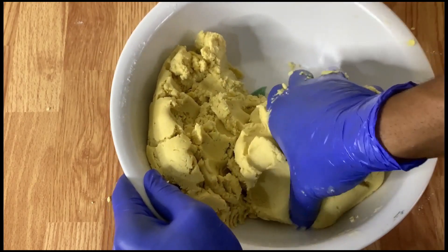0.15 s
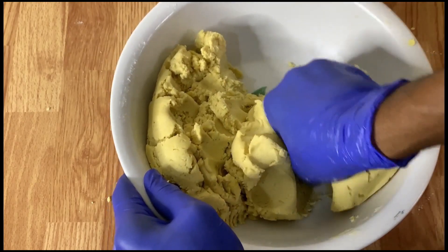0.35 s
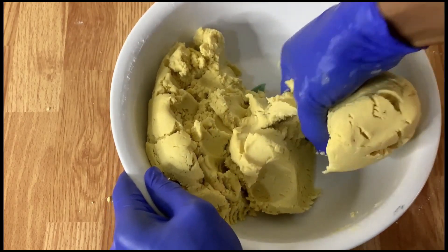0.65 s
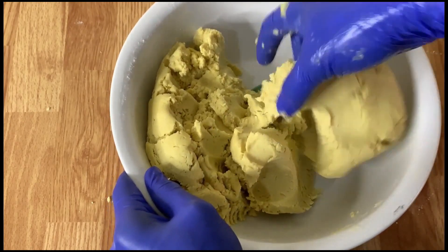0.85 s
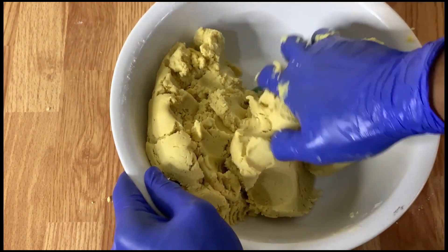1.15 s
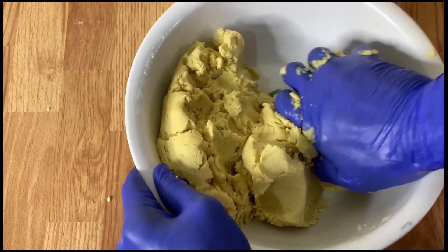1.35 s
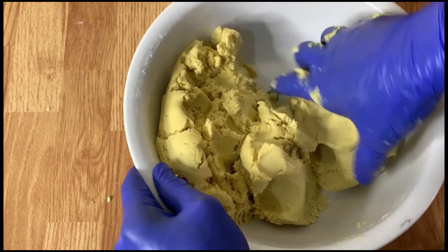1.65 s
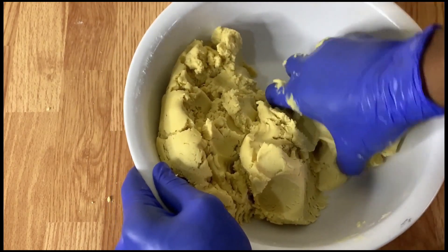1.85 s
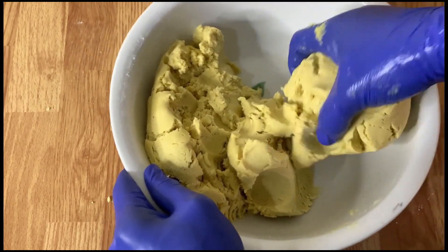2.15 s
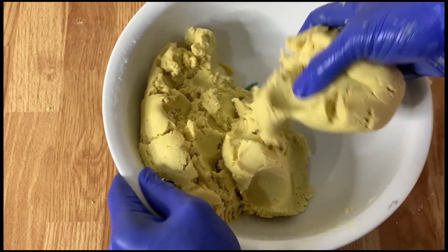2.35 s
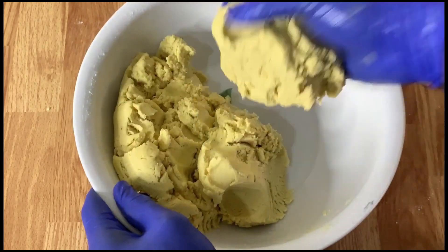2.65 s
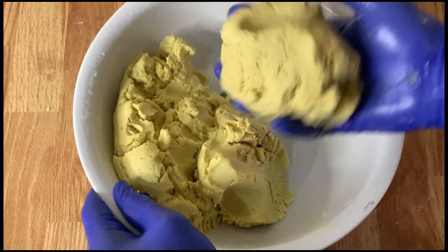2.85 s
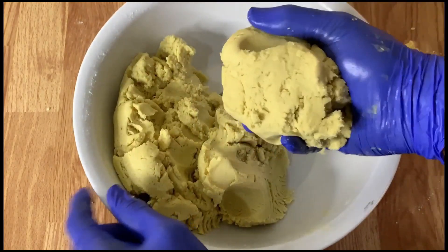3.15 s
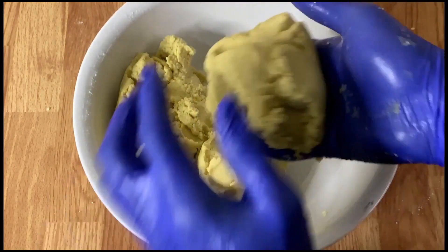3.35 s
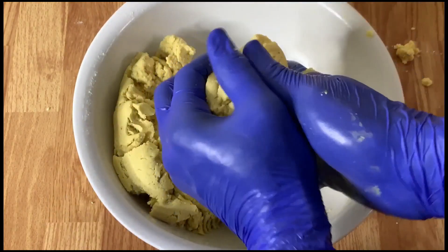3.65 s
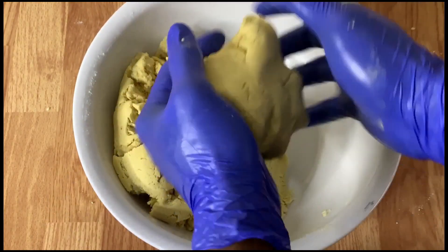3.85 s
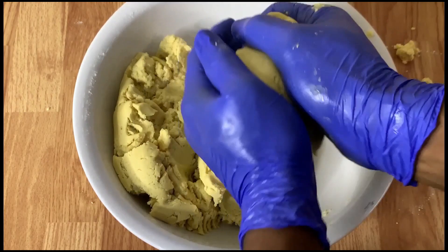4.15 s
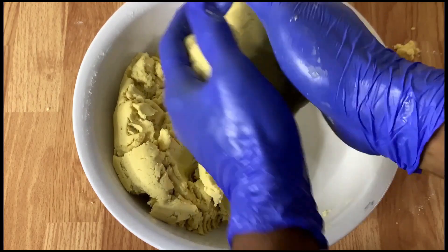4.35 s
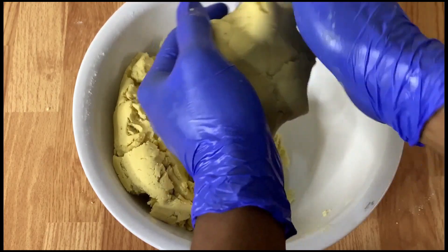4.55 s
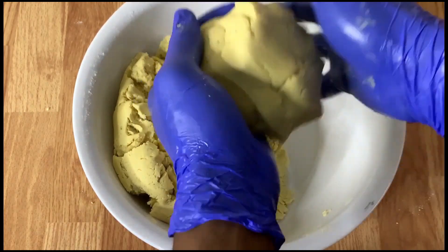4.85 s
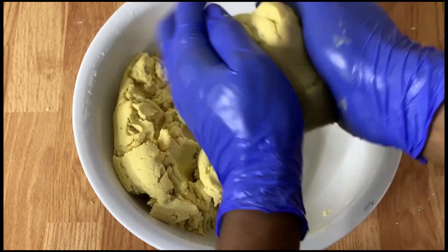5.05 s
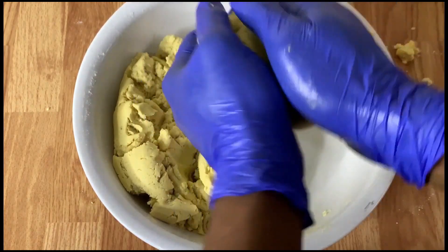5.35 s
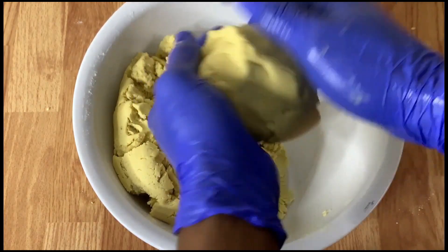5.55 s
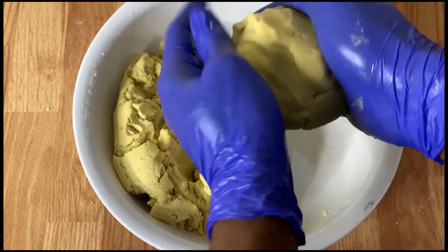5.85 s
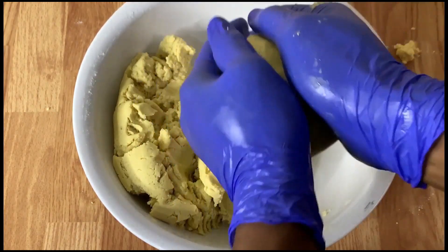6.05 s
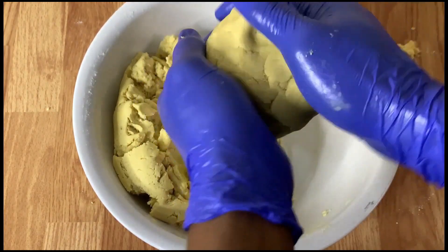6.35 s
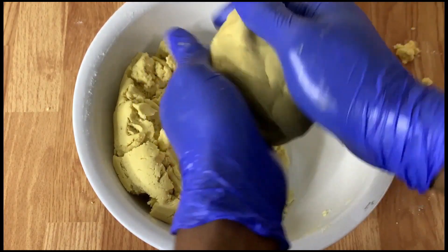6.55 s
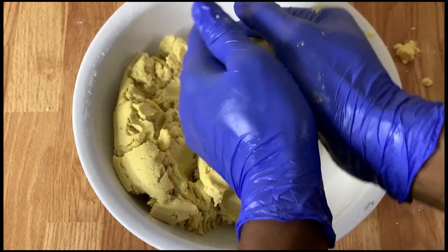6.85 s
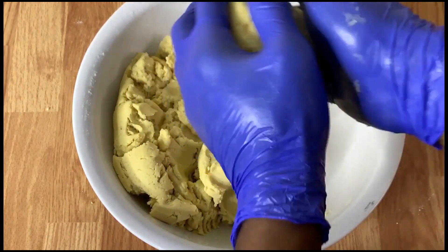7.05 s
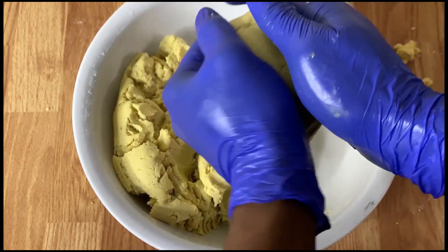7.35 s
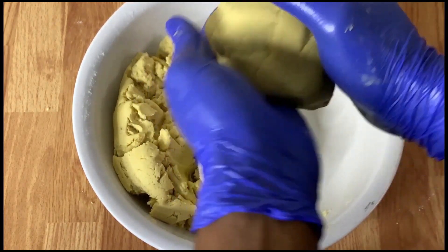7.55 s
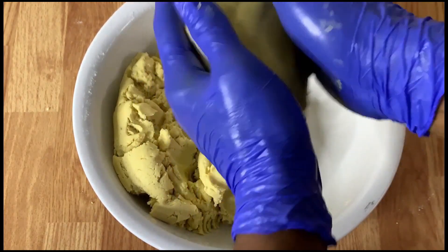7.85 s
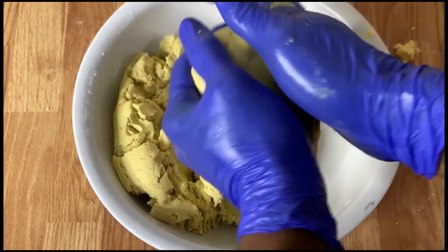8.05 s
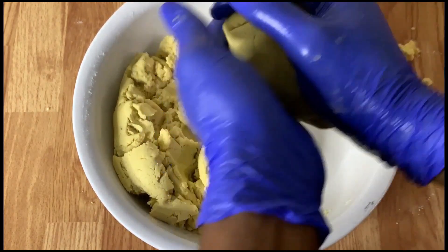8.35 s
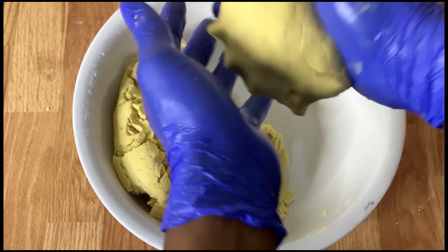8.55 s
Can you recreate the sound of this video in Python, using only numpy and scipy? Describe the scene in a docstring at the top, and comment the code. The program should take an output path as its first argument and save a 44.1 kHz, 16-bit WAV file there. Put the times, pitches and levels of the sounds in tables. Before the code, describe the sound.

Close kitchen sounds of rubber gloves squishing dense dough, short crackly rubs and snaps, a bowl knocking on wood and soft low thumps.

```python
"""A kitchen: gloved hands knead crumbly dough in a plastic bowl on a wooden counter, then pat a ball of it into
shape. The bowl knocks and slides, as pulses of squeezed air and noise ringing through its resonances. The
gloves squish, peel and snap, as clumped grains of noise and millisecond blips; the counter thumps softly, as
low sines that sag. The room answers with decaying noise tails. Much of the treble is nearly the same in both
channels, the left a little ahead; the level dips briefly twice."""
import sys
import numpy as np
from scipy import signal
from scipy.fft import rfft, irfft, next_fast_len
from scipy.io import wavfile
from scipy.ndimage import uniform_filter1d, map_coordinates

SR = 44100
rng = np.random.default_rng(int(sys.argv[2]) if len(sys.argv) > 2 else 0)


def unload_audio(sound):
    """Save the sound as a 16-bit wav file, at the path given as the first command line argument."""
    columns = np.transpose(np.atleast_2d(sound))
    # keep every value between -1 and 1, then stretch to whole-number steps
    steps = np.round(np.clip(columns, -1, 1) * 32767)
    wavfile.write(sys.argv[1], SR, steps.astype(np.int16))


def ratio_of_db(decibels):
    """Turn decibels (scalar or array-like) into linear amplitude factors; 0 dB maps to 1."""
    return 10 ** (np.asarray(decibels, float) / 20)


N = 384111  # samples


def unit(x):
    """Scale to rms 1."""
    return x / np.sqrt(np.mean(x ** 2) + 1e-20)


def along(points, hz):
    """Read a table of (frequency, value) points on a log frequency axis."""
    point_hz, value = np.transpose(points)
    return np.interp(np.log(hz + 1), np.log(point_hz + 1), value)


def curves(rows):
    """One value per sample for each column after the time."""
    s, *columns = np.transpose(rows)
    return [np.interp(np.arange(N) / SR, s, column) for column in columns]


def wobble(rate):
    """A smooth random curve, rate knots a second."""
    knots = rng.standard_normal(int(N * rate / SR) + 4)
    return map_coordinates(knots, [np.arange(N) * rate / SR])


def ramps(rows, rise_db_per_s, fall_db_per_s):
    """Gain of (start_s, length_s, level_db) events that climb, hold and die away at steady rates."""
    t = np.arange(N) / SR
    gain = 0
    for start, length, db in rows:
        climb_db = rise_db_per_s * np.maximum(start - t, 0)
        decay_db = fall_db_per_s * np.maximum(t - start - length, 0)
        gain = gain + ratio_of_db(db - climb_db - decay_db)
    return gain


def filtered(x, response):
    """x times a complex response of frequency."""
    n = x.shape[-1]
    m = next_fast_len(n + 4096)
    return irfft(rfft(x, m) * response(np.fft.rfftfreq(m, 1 / SR)), m)[..., :n]


def coloured(x, spectrum):
    """x shaped by a spectrum table, rms 1."""
    return unit(filtered(x, lambda hz: ratio_of_db(along(spectrum, hz))))


def peak(f, hz, width_hz):
    """One causal resonance."""
    return 1j * f * width_hz / (hz * hz - f * f + 1j * f * width_hz + 1e-9)


def above(x, corner_hz):
    """The part of x above a steep corner."""
    return filtered(x, lambda hz: 1 / (1 + (corner_hz / (hz + 1)) ** 8))


def add(track, s, sound):
    """Mix a short sound in at time s."""
    i = round(s * SR)
    track[..., i:i + sound.shape[-1]] += sound


# how alike the two ports hear each frequency: pitch_hz, likeness (0 to 1)
PORT_LIKENESS = [(60, 1), (200, 0.81), (600, 0.24), (1500, 0.2), (3000, 0.53), (4400, .99), (9000, 0.89),
                 (15000, 0.44)]


def spread(a, b):
    """Mix two versions of a sound into two ports with the likeness of each frequency."""
    def mid_side_gain(hz):
        angle = np.arccos(np.clip(along(PORT_LIKENESS, hz), -1, 1)) / 2
        return np.array([np.cos(angle), np.sin(angle)])
    mid, side = filtered(np.array([a, b]), mid_side_gain)
    return np.array([mid + side, mid - side])


# work of arms and hands between strokes: time_s, counter_stir_db, glove_rustle_db
HAND_WORK = [(0.0, -69.5, -79.5), (0.34, -68, -83), (0.65, -57, -59), (1.05, -64, -76.5),
             (1.89, -63, -71.5), (2.18, -59, -58.5), (2.5, -62, -75.5), (2.75, -53.5, -63),
             (3.05, -65.5, -69.5), (3.45, -62.5, -54.5), (3.7, -55.5, -75), (4.3, -49.5, -60),
             (5.3, -58.5, -71), (5.6, -56.5, -71), (6.94, -58.5, -57.5), (7.33, -59.5, -66),
             (7.55, -52.5, -55), (8.35, -62.5, -64.5), (8.71, -59, -62)]
# soft pushes sounding in the wood: time_s, level_db
WOOD_PUSHES = [(.46, -48.5), (0.902, -49), (1.31, -47.5), (1.75, -45), (2.011, -41), (2.86, -52.5),
               (3.3, -60), (3.45, -51), (3.52, -45), (4.051, -48.5), (5.46, -50), (6.14, -47),
               (6.57, -49.5), (7.01, -48.5), (7.42, -48), (8.609, -50)]
# spectral shapes of bass rumble, wood and room air: pitch_hz, level_db (per Hz)
RUMBLE_SPECTRUM = [(20, -15.5), (45, -10.5), (80, 1), (130, -3), (190, -14), (300, -37)]
WOOD_SPECTRUM = [(150, -24), (220, -1.5), (300, 3), (400, -4), (500, -21.5), (800, -51.5)]
AIR_SPECTRUM = [(30, -24.5), (100, 30.5), (300, 1.5), (600, -13), (1500, -38.5), (4000, -50.5), (9000, -29),
                (15500, -31.5)]


def background():
    """Arms and counter stir in the bass over the steady air of the room; pushes sound in the wood."""
    air_db, wood_rest_db = -83, -4  # wood between pushes, against the counter stir

    def noise(spectrum):
        return coloured(rng.standard_normal((2, N)), spectrum)

    stir = ratio_of_db(curves(HAND_WORK)[0])
    pushes = ramps([(s, 0, db) for s, db in WOOD_PUSHES], rise_db_per_s=500, fall_db_per_s=90)
    rumble = stir * ratio_of_db(5 * wobble(15)) * noise(RUMBLE_SPECTRUM)
    wood_level = pushes + ratio_of_db(wood_rest_db) * stir
    wood = wood_level * ratio_of_db(3.5 * wobble(30)) * noise(WOOD_SPECTRUM)
    air = ratio_of_db(air_db) * noise(AIR_SPECTRUM)
    return spread(*(rumble + wood + air))


# resonances of bowl and counter top: pitch_hz, width_hz, level_db
BOWL_RESONANCES = [(264.5, 63, -0.5), (346, 210, -14), (420, 66, -10), (588.6, 21, 4.5), (706, 27, 6),
                   (810, 54, 2), (982, 44, 3.5), (1066, 39, 4.5), (1270, 95, -1.5), (1480, 86, -10),
                   (1760, 120, -13)]


def bowl_body(f):
    """The resonances of the bowl standing on the counter, alternating in sign, with the treble rolled off."""
    body = 0
    for k, (hz, width_hz, db) in enumerate(BOWL_RESONANCES):
        body = body + (-1) ** k * ratio_of_db(db) * peak(f, hz, width_hz)
    return body / (1 + (f / 2300) ** 4)


# the bowl slides: start_s, length_s, level_db
BOWL_DRAGS = [(-.05, 0.067, -54), (1.165, 0.083, -41), (1.93, .05, -62.5), (2.38, 0.0858, -45)]


def drag():
    """The bowl's foot rubs over the wood: unsteady noise sounds the bowl's resonances."""
    rub = filtered(rng.standard_normal((2, N)), lambda f: bowl_body(f) * peak(f, 1000, 900))
    level = ramps(BOWL_DRAGS, rise_db_per_s=702, fall_db_per_s=449)
    return spread(*(level * ratio_of_db(2.3 * wobble(27)) * unit(rub)))


def crackle(clump_db, spike_db):
    """Dense tiny tears: noise in clumps of a few milliseconds, with rare sharp grains."""
    clumps = ratio_of_db(clump_db * (wobble(35) + 1.6 * wobble(140)))
    grains = np.minimum(rng.exponential(size=N // 12 + 1), 6)
    spikes = ratio_of_db(spike_db * np.repeat(grains, 12)[:N])  # each grain lasts 12 samples
    return unit(clumps * spikes ** .9) * rng.standard_normal((2, N))


def pocketed(x, pocket_hz, pocket_db, patchy_db):
    """The hollow between palm and dough lifts a moving band; folds of glove colour the sound in patches."""
    f, t, z = signal.stft(x, SR, nperseg=256)
    centre = pocket_hz[np.minimum((t * SR).astype(int), N - 1)]
    pocket = 1 + ratio_of_db(pocket_db) * abs(peak(f[:, None], centre, .19 * centre)) ** 2
    patches = uniform_filter1d(rng.standard_normal(z.shape[1:]), 3, 0)  # smooth over frequency
    patches = uniform_filter1d(patches, 7, 1)  # then over time
    gain = pocket * ratio_of_db(patchy_db * unit(patches))
    return unit(signal.istft(z * gain, SR, nperseg=256)[1][:, :N])


# strokes of the gloves on the dough: time_s, level_db, length_s, pocket_hz, brightness_db (treble over middle)
GLOVE_STROKES = [(0.454, -77, .45, 3000, 21), (1.226, -59, .15, 1910, 4.5), (1.93, -74.5, .15, 2970, 23),
                 (0.691, -42, .021, 3540, 2), (0.745, -39, 0.019, 3490, 2),
                 (0.77, -44.5, 0.042, 3040, -19.5), (0.867, -56, 0.013, 3540, 14),
                 (1.486, -29.5, 0.039, 2680, 0.1), (1.513, -31, 0.022, 3370, .6),
                 (2.009, -24, .015, 1910, -9.5), (2.468, -66.5, .085, 4300, 20.5),
                 (2.616, -43.5, .04, 2600, 15.5), (2.639, -26.5, 0.073, 2970, -2),
                 (2.675, -23, 0.021, 3450, 5.5), (2.778, -47, .05, 4020, 10), (2.826, -41, 0.045, 3690, -6),
                 (2.869, -41.5, 0.013, 2484, -1), (2.95, -57.5, 0.032, 3350, 0),
                 (3.268, -26.5, .049, 2810, 4), (3.319, -35, 0.033, 2560, 12),
                 (3.428, -40.5, 0.023, 3350, 9), (3.667, -47, 0.042, 2750, 10.5),
                 (3.712, -49.5, .022, 2930, 11), (3.859, -37.5, .055, 4420, 4.5),
                 (4.027, -51, 0.05, 3810, 1.5), (4.129, -46, .03, 3000, -1.5),
                 (4.18, -31.5, 0.071, 2540, 2), (4.261, -23, 0.034, 2674, 2), (4.363, -29, .021, 3500, -6),
                 (4.378, -24.5, 0.011, 3890, -2.5), (4.431, -45.5, .055, 3560, 6),
                 (4.477, -46, .029, 3460, 4.5), (4.56, -29.5, .021, 3270, -0.5),
                 (4.711, -22, 0.032, 2380, -1), (4.758, -26, .044, 3005, -0.5),
                 (4.863, -49.5, .08, 2900, 13), (4.926, -43, .026, 3280, 1.5),
                 (5.096, -41, 0.032, 3200, -1.5), (5.113, -43, .045, 3440, 8.5),
                 (5.195, -31.5, 0.049, 3090, 5.5), (5.445, -33.5, 0.046, 2990, 0.5),
                 (5.473, -39.5, 0.024, 3050, 13.5), (5.533, -53.5, 0.02, 3370, 13),
                 (5.658, -44, .027, 2860, 12), (5.72, -39, 0.039, 2960, 7), (5.83, -30.5, 0.013, 2430, 7),
                 (5.946, -55, .033, 2450, 8.5), (6.093, -48, 0.038, 2990, 17.5),
                 (6.123, -23.5, .034, 2920, -8.5), (6.168, -19.5, 0.0198, 2930, 1.5),
                 (6.398, -51.5, .016, 3340, 9), (6.487, -44.5, 0.012, 2810, 12.5),
                 (6.566, -23.5, 0.06, 3400, -3), (6.858, -40.5, 0.036, 2770, -13),
                 (6.925, -26, 0.041, 3490, -8), (6.987, -28.5, .052, 3260, 2), (7.11, -44.5, 0.06, 4250, 5),
                 (7.224, -57, 0.02, 3550, 17), (7.327, -52.5, 0.023, 3170, -15.5),
                 (7.397, -28.5, 0.034, 3810, -5.5), (7.428, -24, 0.042, 3920, -0.5),
                 (7.714, -31.5, 0.024, 3300, -1.5), (7.732, -30.5, .018, 2670, 0),
                 (7.781, -27.5, 0.029, 1898, -2), (7.814, -32, .05, 2390, -0.5),
                 (8.06, -27, 0.032, 3230, 4.5), (8.083, -27, 0.027, 3530, 7), (8.106, -32, .015, 3500, 7),
                 (8.164, -24, 0.038, 2540, -1.5), (8.25, -39.5, 0.026, 2510, 9),
                 (8.443, -39, 0.035, 2204, 5), (8.456, -31, 0.049, 4180, 4.5), (8.527, -47, .033, 3970, 11),
                 (8.557, -33, .023, 2410, 8), (8.588, -22.5, 0.043, 2800, 2.5)]


def strokes():
    """Pressure of the hands: level of the middle and the treble, and the pocket pitch, led by the strongest stroke."""
    rise_share = 0.46  # of a stroke's length; each side is the time to change by 10 dB
    pocket_glide = .35  # the hollow closes: its pitch climbs from this share below to this share above
    power, t = np.zeros((3, N + SR)), np.arange(-SR // 4, SR // 4) / SR
    for s, db, length, hz, bright_db in GLOVE_STROKES:
        rise, fall = rise_share * length, (1 - rise_share) * length
        distance = np.where(t < 0, -t / max(rise, .003), t / max(fall, .003))
        shape = ratio_of_db(2 * (db - 10 * distance ** 1.4))  # as power
        treble = shape * ratio_of_db(2 * bright_db)
        pocket = hz * (1 + pocket_glide * np.clip(t / length, -1, 1))
        add(power, s + .25, np.array([shape, treble, shape * pocket]))
    floor = np.array([[1e-9], [1e-9], [3e-6]])  # the pocket rests at 3000 Hz
    mid, top, weighted_hz = power[:, SR // 2:SR // 2 + N] + floor
    return np.sqrt(mid), np.sqrt(top), weighted_hz / mid


# spectral shapes of glove crackle and dough squelch: pitch_hz, level_db (per Hz)
GLOVE_SPECTRUM = [(1000, -33.5), (1600, -13), (2200, -9.5), (3900, -11), (4400, -10.5), (8000, -13),
                  (12000, -15.5), (15500, -16)]
DOUGH_SPECTRUM = [(250, -4.5), (500, 0.5), (900, 0), (1500, -0.5), (2000, -6), (3000, -36.5)]
# the dough's squelch against the crackle, varying over time, fullest around 2.2 s: time_s, level_db
SQUELCH_BALANCE = [(0, 1), (1.2, -7), (2.2, 17), (2.55, -9), (4, -4), (8.71, -8)]
# the glove slides smoothly along the bowl's wall: start_s, length_s, level_db
WALL_SLIDES = [(.3, .35, -54), (1.87, 0.74, -57.5)]


def squish():
    """The gloves rub and tear the dough: grains in the middle and treble, a duller squelch below, a thin hiss above."""
    hiss_db = 2.5  # treble of the rustle over its middle
    sheen_hz, sheen_db = 9500, -7  # the thin hiss lies above this; its level against slides and rustle
    mid, top, pocket_hz = strokes()
    rustle = ratio_of_db(curves(HAND_WORK)[1] + 1.2 * wobble(11))
    body_db = curves(SQUELCH_BALANCE)[0]

    tears = coloured(crackle(clump_db=1.7, spike_db=2.6), GLOVE_SPECTRUM)
    rub = pocketed(tears, pocket_hz, pocket_db=8, patchy_db=4)
    high = above(rub, 4600)
    sheen = above(high, sheen_hz)
    body = coloured(crackle(clump_db=1, spike_db=.6), DOUGH_SPECTRUM)
    body = pocketed(body, pocket_hz, pocket_db=-20, patchy_db=2.5)

    mid = 1.075 * mid + rustle
    top = 0.88 * top + ratio_of_db(hiss_db) * rustle
    slide = ramps(WALL_SLIDES, rise_db_per_s=60, fall_db_per_s=120) + rustle
    squelch = 0.43 * mid ** 0.89  # the body grows less than the crackle as the hands press harder
    grains = mid * unit(rub - high) + top * unit(high)
    thin_hiss = ratio_of_db(sheen_db) * slide * unit(sheen)
    return spread(*(grains + thin_hiss + ratio_of_db(body_db) * squelch * body))


# the room's decay: pitch_hz, t60_s
ROOM_DECAY = [(100, 1), (500, 0.75), (1500, 0.55), (4000, 0.44), (12000, 0.27)]


def kitchen(x):
    """Each frequency of the room's answer dies at its own speed; it is redrawn at random every third of a second."""
    out, step = np.zeros((2, N + 2 * SR)), SR // 3
    for i in range(0, N, step):
        hz, t, z = signal.stft(rng.standard_normal((2, SR * 2 // 3)), SR, nperseg=256)
        decay = ratio_of_db(-60 * t / along(ROOM_DECAY, hz)[:, None])
        tail = signal.istft(z * decay, SR, nperseg=256)[1]
        tail = tail / np.linalg.norm(tail[0])
        add(out, i / SR + .008, signal.fftconvolve(x[None, i:i + step], tail, axes=1))
    return spread(*out[:, :N])


# dull thumps through the counter: start_s, level_db (peak), pitch_hz, rise_s, t60_s
COUNTER_THUMPS = [(0.452, -40, 40, 0.0069, 0.099), (1.121, -37, 330, 0.0055, 0.046),
                  (2.02, -46, 45, .011, .15), (3.585, -14, 57.2, 0.062, 0.117),
                  (3.651, -23.5, 50.5, 0.0058, 0.43), (3.82, -22, 62.2, 0.0091, 0.29),
                  (3.87, -29, 45.97, 0.0097, 0.55), (4.094, -17, 39.8, 0.003, 0.2),
                  (4.201, -34, 58.4, .018, 0.38), (4.441, -38, 62.3, .012, 0.13),
                  (4.56, -45, 89.4, 0.0137, 0.054), (5.407, -23.5, 246, 0.0046, 0.068),
                  (5.421, -28, 260.3, 0.0031, 0.071), (5.433, -31, 162.7, 0.0088, 0.068),
                  (5.437, -38, 317.4, 0.0045, 0.078), (5.783, -21.5, 47.7, 0.0072, 0.19),
                  (6.559, -40.5, 94, .017, 0.08), (7.693, -34, 52.8, 0.014, 0.22),
                  (7.907, -31.5, 40.6, 0.0088, 0.097), (8.592, -46, 94.3, 0.0081, 0.2)]


def thumps():
    """A soft blow swings the counter at a low pitch that sags as the contact spreads."""
    out, t = np.zeros((2, N + SR)), np.arange(SR // 2) / SR
    leans = rng.normal(0, 0.2, len(COUNTER_THUMPS))  # radians, opposite in the two ports
    for (s, db, hz, rise, t60), lean in zip(COUNTER_THUMPS, leans):
        sag_cycles = 0.32 * 0.013 / rise  # extra cycles; faster blows start further above their pitch
        turns = hz * t + sag_cycles * (1 - np.exp(-t / 0.0091))
        shape = ratio_of_db(-60 * t / max(t60, .02)) * (1 - np.exp(-(t / rise) ** 2))
        swing = np.sin(2 * np.pi * turns + lean * np.array([[1], [-1]]))
        add(out, s, ratio_of_db(db) * shape / shape.max() * swing)
    return out[:, :N]


# the bowl rocks onto the counter: time_s, level_db, pitch_hz, ringing_db (against the blow), left_right_db
BOWL_KNOCKS = [(0.467, -15, 732, -16.5, 0), (0.904, -8.5, 762, -28, -7.5), (0.982, -27.5, 810, -19, 1),
               (0.991, -28.5, 817, -27, -7), (1.253, -16.5, 760, -18.5, 1),
               (1.533, -28.5, 735, -17.5, -7.5), (1.731, -24.5, 785, -24, -4.5),
               (1.864, -25, 779.6, -22, -4.5), (2.005, -9, 750, -12.5, -7), (2.876, -30.5, 880, -28, 2),
               (3.424, -33.5, 1190, -20.5, 0.5), (8.595, -25, 471, -29.5, -1.5)]


def knocks():
    """Each knock is a few cycles of air squeezed under the bowl; bowl and counter ring on, the counter booms late."""
    full_s, s_per_db = .0145, .00032  # length at 0 dB; softer knocks are shorter
    out, t = np.zeros((2, N + SR)), np.arange(SR // 2) / SR

    def tone(hz):
        return np.sin(2 * np.pi * hz * t)

    for s, db, hz, ring_db, pan_db in BOWL_KNOCKS:
        length = full_s + s_per_db * db
        swell = np.sin(np.pi * np.minimum(t / max(length, .003), 1) ** 0.86) ** 2
        blow = 1.13 * swell * (tone(hz) + 0.29 * tone(1.598 * hz))
        blow += swell ** 7.3 * (0.37 * tone(.58 * hz) + 0.19 * tone(2.15 * hz))  # only at the crest
        ring_shape = ratio_of_db(-60 * t / 0.53) * (1 - np.exp(-t / 0.00043))
        ring = filtered(ring_shape * rng.standard_normal((2, len(t))), bowl_body)
        ring = (.5 * ring.mean(0) + 0.28 * ring) / ring[:, :4000].std()  # partly shared by the ports
        boom = 0.8 * ratio_of_db(-60 * t / 0.47) * (1 - np.exp(-t / 0.017)) * tone(130)
        pan = ratio_of_db(np.array([[pan_db / 2], [-pan_db / 2]]))
        knock = pan * (blow + ratio_of_db(ring_db) * ring) + ratio_of_db(ring_db) * boom
        add(out, s - .002, ratio_of_db(db) * knock)
    return out[:, :N]


# gloves peeling off with a snap: time_s, level_db, low_hz, high_hz (band)
GLOVE_SNAPS = [(0.7, -21, 5900, 7200), (0.7485, -20.5, 3080, 7600), (1.492, -10, 2740, 4730),
               (2.005, -10, 2170, 3340), (2.5951, -13.5, 4800, 8750), (2.6131, -13, 8400, 11000),
               (2.6318, -14.5, 2280, 4040), (2.648, -12, 2500, 3380), (2.875, -23.5, 2727, 9100),
               (3.313, -16, 5700, 12300), (3.3276, -12, 8100, 14000), (3.424, -13, 5000, 9850),
               (3.7021, -22, 9100, 13600), (4.1257, -24, 3340, 4640), (4.2626, -18, 2560, 7300),
               (4.361, -19, 2700, 5360), (4.381, -8.5, 6900, 10100), (4.5622, -15, 2500, 3660),
               (4.7025, -11, 2800, 7000), (4.754, -11.5, 2800, 9900), (4.762, -6.5, 2800, 10700),
               (5.48, -6, 8400, 12100), (5.5325, -14, 10000, 14000), (5.83, -10, 2400, 8840),
               (6.1157, -5, 2900, 13570), (6.1205, -10.5, 2834, 5210), (6.169, -9, 2840, 9500),
               (6.175, -18, 8200, 10200), (6.4904, -12.5, 4640, 7600), (6.5379, -7.5, 5300, 10000),
               (6.5517, -17, 2700, 4800), (6.5584, -7.5, 2940, 3720), (6.5785, -20, 3400, 8000),
               (7.396, -4, 2600, 3860), (7.3986, -17.5, 3400, 4180), (7.423, -3.5, 2670, 5940),
               (7.4495, -23, 2920, 4500), (7.713, -28, 2800, 13000), (7.7332, -10, 3400, 13200),
               (8.0857, -10, 4000, 10700), (8.0937, -11, 4900, 11100), (8.1056, -14, 5860, 14700),
               (8.153, -14, 2210, 3100), (8.4649, -17, 6540, 10000), (8.5877, -14, 2800, 10900),
               (8.5963, -10.5, 2350, 5000)]


def snaps():
    """A snap is a blip of about a millisecond in one band, with a weak short fizz after it."""
    out, t = np.zeros((2, N + SR)), np.arange(-SR // 200, SR // 40) / SR
    fizz = .25 * (t > 0) * ratio_of_db(-60 * np.abs(t) / .03)
    blip = np.exp(-(t / .0008) ** 2) + fizz
    for s, db, low_hz, high_hz in GLOVE_SNAPS:
        def band(f):
            low_cut = 1 + (.85 * low_hz / (f + 1)) ** 8
            high_cut = 1 + (f / (1.15 * high_hz)) ** 8
            return 1 / np.sqrt(low_cut * high_cut)
        snap = filtered(blip * rng.standard_normal((2, len(t))), band)
        add(out, s + t[0], ratio_of_db(db) * snap / np.abs(snap).max())
    return spread(*out[:, :N])


def scene():
    """Near sounds, their room, and the background."""
    bowl = knocks() + drag()
    gloves = squish() + snaps()
    room = kitchen(ratio_of_db(-11.5) * bowl.mean(0) + ratio_of_db(-9) * gloves.mean(0))
    return bowl + gloves + thumps() + room + background()


# level between the ports: pitch_hz, left_right_db
PORT_TILT = [(60, -0.5), (1200, -0.5), (2000, -2.5), (3000, -1), (4100, 0)]
# phase between the ports: pitch_hz, left_lead_rad
PORT_LEAD = [(0, 0), (700, -.6), (1500, 0), (2200, 1.2), (3700, 1.7), (4650, 3.14), (9000, 9.42),
             (15300, 18.85), (22050, 28.9)]
# upper band limit: pitch_hz, level_db
BAND_LIMIT = [(15600, -0.5), (16100, -34), (16600, -52), (16900, -68.5)]


def two_channels(x):
    """The left channel leads in the treble, the right is louder in the middle; the top of the band is cut."""
    def response(hz):
        lead = np.interp(hz, *np.transpose(PORT_LEAD))
        half = ratio_of_db(along(PORT_TILT, hz) / 2) * np.exp(.5j * lead)  # each port takes half the difference
        return ratio_of_db(along(BAND_LIMIT, hz)) * np.array([half, 1 / half])
    return filtered(x, response)


# the level dips briefly: start_s, end_s, level_db
LEVEL_DIPS = [(.656, .678, -90), (2.4, 2.422, -9)]


def level_dips(x):
    """Briefly lower the level of both ports, with edges smoothed over 40 samples."""
    t = np.arange(N) / SR
    for start, end, db in LEVEL_DIPS:
        gain = np.where((t > start) & (t < end), ratio_of_db(db), 1)
        x = x * uniform_filter1d(gain, size=40)
    return x


def low_pass(x):
    """Removes everything above the highest recorded frequency."""
    return signal.sosfilt(signal.butter(12, 16980, fs=SR, output="sos"), x)


def record(dry):
    """The scene is shaped into its two channels, then the level dips are applied."""
    mix = level_dips(two_channels(dry))
    return low_pass(mix)


dry = scene()
out = record(dry)
unload_audio(out)
```